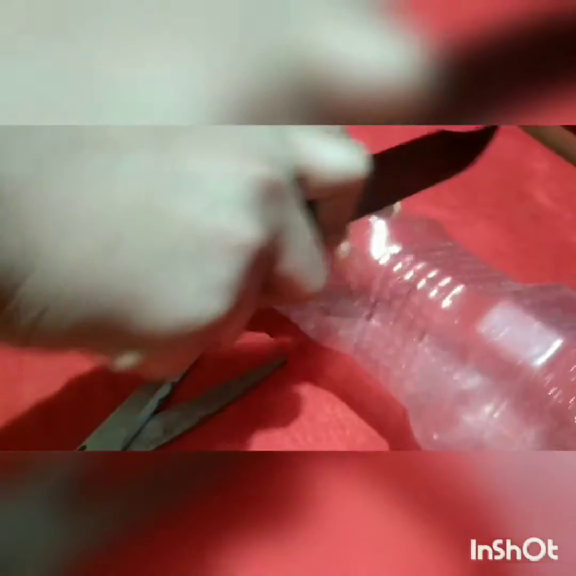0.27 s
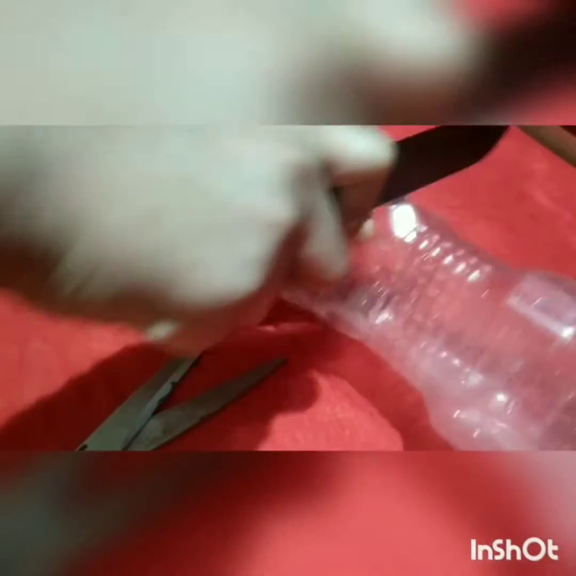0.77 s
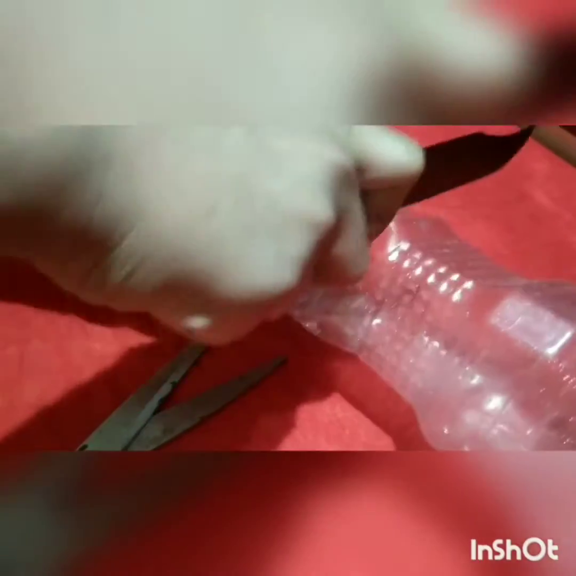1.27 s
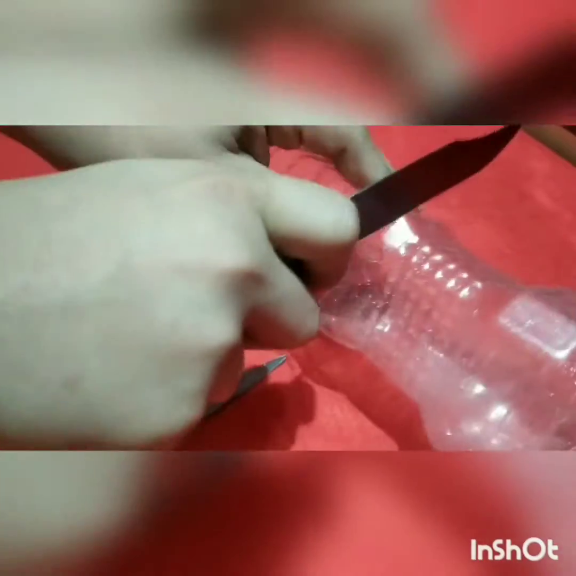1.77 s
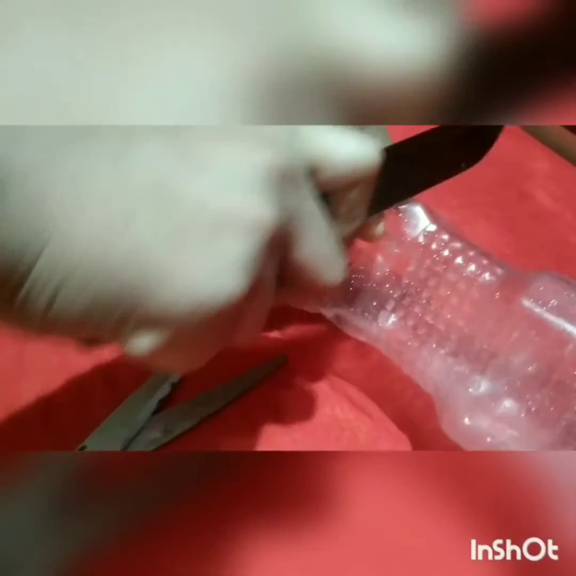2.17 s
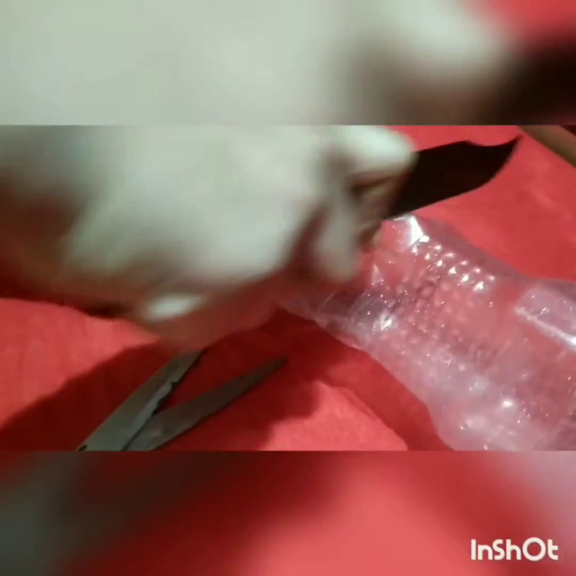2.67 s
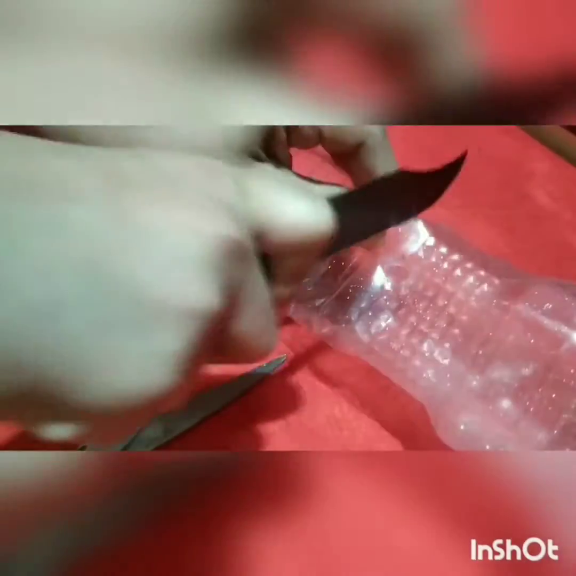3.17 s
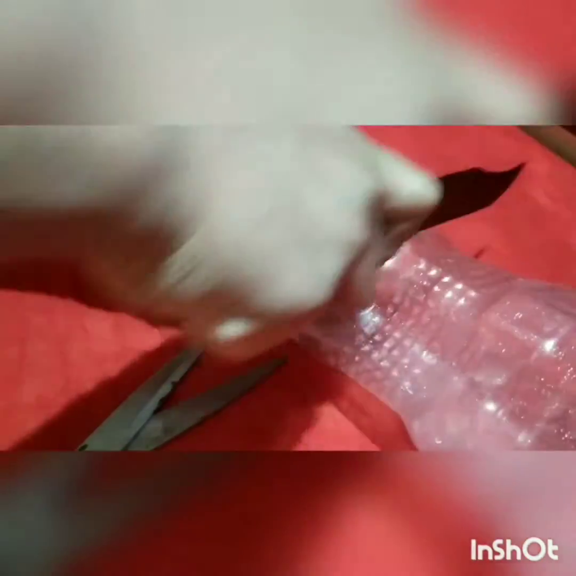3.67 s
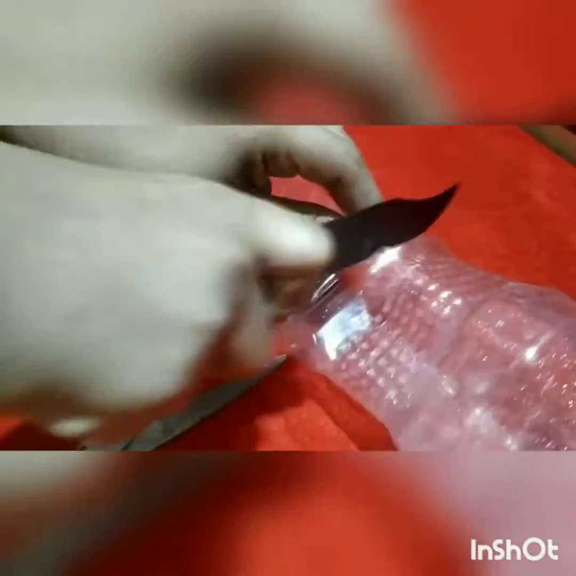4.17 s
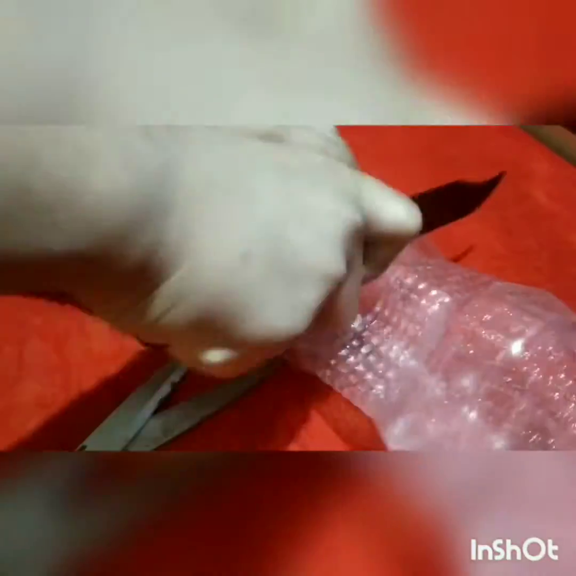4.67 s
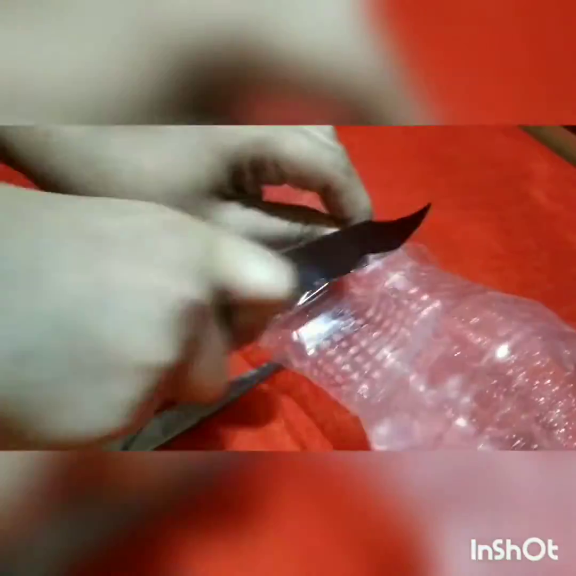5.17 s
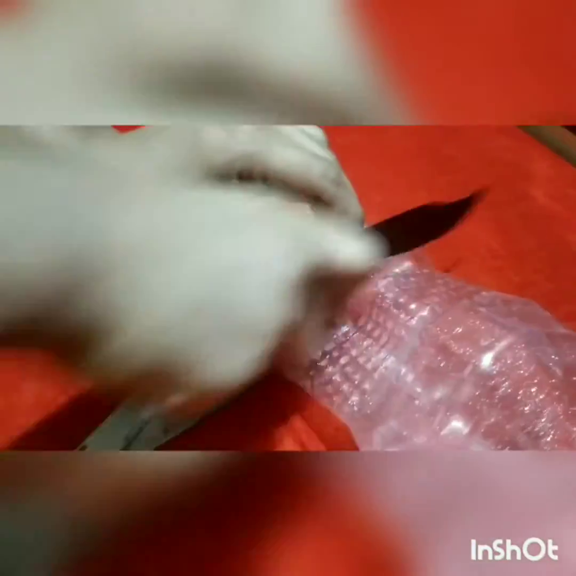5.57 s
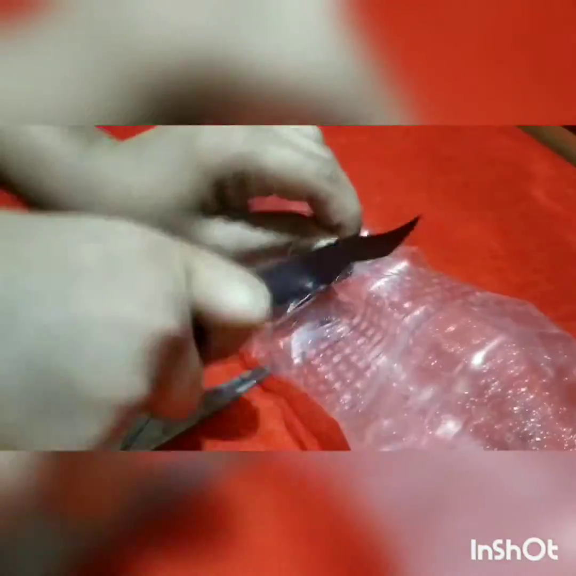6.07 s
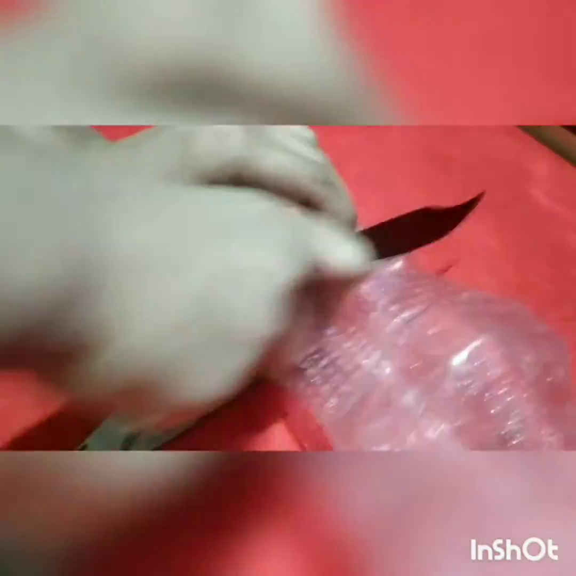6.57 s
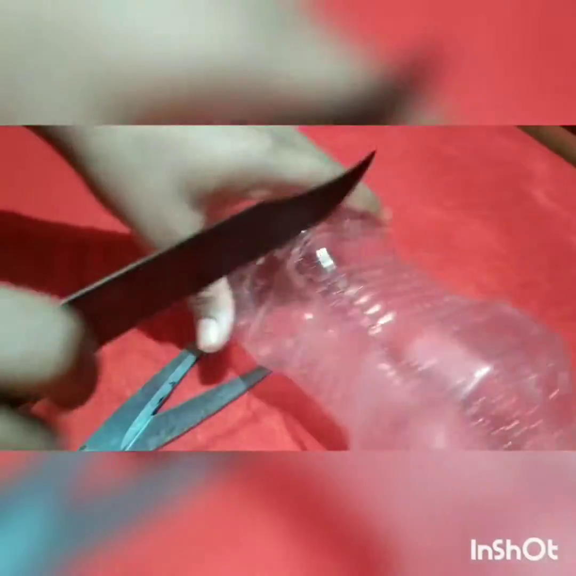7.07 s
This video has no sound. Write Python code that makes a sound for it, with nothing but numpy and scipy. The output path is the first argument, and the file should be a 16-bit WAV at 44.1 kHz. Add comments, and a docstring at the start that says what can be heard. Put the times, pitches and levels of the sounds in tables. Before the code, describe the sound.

A knife saws quickly through a thin, hollow plastic bottle, hissing and rasping, with sharp snaps and short rips, then a few last crackles.

```python
"""Fast sawing strokes hiss and shake a thin, hollow wall; rips and loud snaps cut in; a last few snaps end it.
A knife saws to and fro through an empty plastic bottle on a cloth-covered table in a small room.
Stick-slip noise makes hiss, rasp and the drive of the bottle; volleys of tiny fractures make the rips.
Damped panel modes make snaps and bumps; shaped noise makes the faint table rumble and room air.
Noise echoes dying band by band make the room."""
import sys
import numpy as np
from scipy import signal
from scipy.fft import rfft, irfft, next_fast_len
from scipy.io import wavfile
from scipy.ndimage import uniform_filter1d

SR = 44100
rng = np.random.default_rng(int(sys.argv[2]) if len(sys.argv) > 2 else 0)


def master(y):
    """Save y as 16-bit WAV."""
    cut = np.clip(np.atleast_2d(y).T, -1, 1)
    pcm = np.round(cut * 32767)  # scale
    wavfile.write(sys.argv[1], SR, pcm.astype(np.int16))


N = 322371

# blade strokes: (start [s], length [s], force [relative dB], wall over edge [dB], wall pitch [Hz])
STROKES = [(0.1, 0.14, -1.5, 3.5, 488), (0.288, 0.16, 1.2, 3.5, 466), (0.475, 0.15, 0.5, 5.5, 510),
           (0.743, 0.19, 1.5, 4, 499), (0.958, 0.17, 1, 4.5, 622), (1.177, 0.18, 1.5, 6, 430),
           (2.329, 0.14, 0.5, -3.5, 585), (2.493, 0.17, -0.5, 5.5, 492), (2.702, 0.15, -2.5, 7, 500),
           (2.909, 0.14, -1.5, 8.5, 570), (3.077, 0.16, 3.5, 0.5, 465), (3.253, 0.16, 0, 4.5, 590),
           (3.439, 0.13, -2.5, 0.5, 482), (3.593, 0.15, -0.5, 5.5, 556), (3.806, 0.097, -0.5, 4, 600),
           (3.939, 0.14, 1.5, 4.5, 469), (4.108, 0.15, -1.5, 4.5, 560), (4.276, 0.16, 1.5, 4.5, 588),
           (4.434, 0.14, 1, 3, 505.4), (4.592, 0.18, 1.5, 5.5, 584), (4.747, 0.16, -1.5, 5.5, 619),
           (4.918, 0.15, -1, 8.5, 613), (5.087, 0.13, 2.5, 5.5, 715), (5.242, 0.15, 0.5, 6.5, 700),
           (5.408, 0.14, 0, 5.5, 730), (5.554, 0.15, 0.5, 5, 591), (5.712, 0.14, -1, 6, 688),
           (5.86, 0.15, 2, 5, 777), (6.015, 0.14, 1, 3.5, 700), (6.182, 0.13, 8.5, -4, 678),
           (6.313, 0.15, -4, 6, 690), (6.482, 0.13, 0.5, 7, 656), (6.626, 0.24, -1, 2.5, 610),
           (6.738, 0.23, -1, 1, 670)]
# likeness of left and right: (frequency [Hz], correlation [-1..1])
LIKENESS = [(80, 0.96), (200, 1), (450, 0.65), (850, 0.39), (1200, -0.026), (1800, 0.27), (2400, 0.29),
            (3500, 0.057), (5000, -0.021), (15000, -0.021)]


def from_db(db):
    """Decibels to gain."""
    return 10 ** (np.asarray(db) / 20)


def rms_one(x):
    """Scale to unit power."""
    return x / np.sqrt(np.mean(x ** 2) + 1e-20)


def at_hz(points, hz):
    """Read a table on a log-frequency axis."""
    f, value = np.transpose(points)
    return np.interp(np.log(hz + 1e-3), np.log(f), value)


def colour(x, spectrum):
    """Filter by a smooth spectrum [Hz, dB]."""
    size = next_fast_len(x.shape[-1])
    gain = from_db(at_hz(spectrum, np.fft.rfftfreq(size, 1 / SR)))
    return irfft(rfft(x, size) * gain, size)[..., :x.shape[-1]]


def bands(x, centres):
    """Split a sound into overlapping bands that add up to it."""
    spectrum = rfft(x)
    hz = np.fft.rfftfreq(x.shape[-1], 1 / SR)
    return [irfft(spectrum * at_hz(np.c_[centres, share], hz), x.shape[-1])
            for share in np.eye(len(centres))]


def two_ports(pair):
    """Two unrelated signals become left and right: alike in the bass, apart in the treble."""
    size = next_fast_len(pair.shape[-1])
    mid, side = rfft(pair, size)
    alike = np.clip(at_hz(LIKENESS, np.fft.rfftfreq(size, 1 / SR)), -.99, .99)
    left_right = np.sqrt(1 + alike) * mid + np.sqrt(1 - alike) * side * [[1], [-1]]
    return irfft(left_right, size)[:, :pair.shape[-1]]


def noise(size):
    """White noise, left and right."""
    return two_ports(rng.standard_normal((2, size)))


def wobble(size, per_s):
    """Slow random curve, spread about 1."""
    return signal.resample(rng.standard_normal(max(int(size / SR * per_s), 3)), size)


def add(out, s, sound):
    """Mix a sound in at time s."""
    at = max(round(s * SR), 0)
    out[:, at:at + sound.shape[1]] += sound[:, :N - at]


def resonate(x, hz, width_hz):
    """One two-pole resonance, peak gain about 1."""
    r = np.exp(-np.pi * width_hz / SR)
    zeros = np.array([1, 0, -1]) * (1 - r * r) / 2
    poles = [1, -2 * r * np.cos(2 * np.pi * hz / SR), r * r]
    return signal.lfilter(zeros, poles, x)


def struck(hz, level_db, decay_s, t, rise_s=0.00069, tension=0.081, relax_s=0.0055, stagger_turns=.17):
    """Damped modes with staggered phases sink a little in pitch as the plastic relaxes; unit power."""
    order = np.arange(len(hz))[:, None]
    # phase between left and right
    gap = np.arccos(np.clip(at_hz(LIKENESS, hz), -1, 1)) * rng.choice([-1, 1], len(hz))
    bent_t = t + tension * relax_s * (1 - np.exp(-t / relax_s))
    phase = 2 * np.pi * hz[:, None] * bent_t - 2 * np.pi * stagger_turns * order
    envelope = from_db(level_db)[:, None] * np.exp(-t / decay_s[:, None]) * (1 - np.exp(-t / rise_s))
    return rms_one(np.array([(envelope * np.sin(phase + side * gap[:, None] / 2)).sum(0)
                             for side in (1, -1)]))


def click(t, decay_s, count=3):
    """A short burst that holds all frequencies about equally; unit power."""
    burst = rng.standard_normal((2, len(t))) * np.exp(-t / decay_s)
    for _ in range(count):
        flat = irfft(np.exp(1j * np.angle(rfft(burst))), len(t))
        burst = flat * np.exp(-t / (10 * decay_s))
    return rms_one(burst)


def slips(size, per_s, spread_db, slip_s):
    """Stick-slip: random catches release as tiny dying bursts over steady friction; unit power."""
    catches = rng.random(size) < per_s / SR
    force = catches * from_db(spread_db * np.clip(rng.standard_normal(size), -2, 2))
    power = signal.lfilter([1], [1, -np.exp(-1 / (slip_s * SR))], force ** 2)
    return rms_one(noise(size) * np.sqrt(rms_one(power) + .2))


def chatter(hz, width_hz):
    """The plastic catches and slips at a wandering pitch; unit power."""
    stray = np.sqrt(2 * np.pi * width_hz / SR) * rng.standard_normal(len(hz))
    phase = np.cumsum(2 * np.pi * hz / SR + uniform_filter1d(stray, size=60))
    return rms_one(two_ports(np.array([np.sin(phase), np.cos(phase)])))


def blade_speed(t, length):
    """The blade speeds up and stops again within a stroke: 0 to 1."""
    return np.abs(np.sin(np.pi * np.clip(t / length, 0, 1)))


def room_air():
    """Faint shaped noise of the room, slowly changing in level."""
    # (frequency [Hz], density [relative dB])
    air_spectrum = [(30, 4), (150, 6), (500, 6), (1500, -1.5), (4000, -8.5), (10000, -9.5), (16000, -26.5)]
    # (time [s], level [dB])
    air_level = [(0, -59.5), (6.8, -43), (7.12, -55), (7.31, -63)]
    level_db = np.interp(np.arange(N) / SR, *np.transpose(air_level))
    return from_db(level_db) * rms_one(colour(noise(N), air_spectrum))


def hands(level_db=1.5, swell_db=2.0):
    """The table rumbles under the hands, and more while the blade moves."""
    # (frequency [Hz], density [relative dB])
    rumble_spectrum = [(15, -53), (28, -24.5), (42, -15.5), (60, -1.5), (73, 1), (88, 4.5), (115, -3),
                       (170, -13.5), (260, -24), (500, -35), (1500, -47.5)]
    # hand pressure: (time [s], rumble [relative dB])
    pressure = [(0.0, -43.5), (0.45, -52), (0.81, -57.5), (2.58, -50.5), (2.95, -43), (3.46, -55),
                (3.89, -48.5), (4.5, -51), (5.07, -50), (5.44, -43), (6.15, -50), (6.7, -47.5),
                (7.31, -58.5)]
    t = np.arange(N) / SR
    moving = np.max([blade_speed(t - s, length) for s, length, *_ in STROKES], axis=0)
    rumble_db = level_db + np.interp(t, *np.transpose(pressure)) + swell_db * moving
    return from_db(rumble_db) * rms_one(colour(noise(N), rumble_spectrum))


def room(x, first_echo_s=0.0016, size=24000, count=6):
    """Dense near-wall echoes die band by band; their pattern changes as the hands and the bottle move."""
    # (band centre [Hz], t60 [s], echo [relative dB])
    reverb_bands = [(100.8, 0.84, -1.5), (248, 0.3, 0.5), (490, 0.28, -3), (1000, 0.28, -1),
                    (1990, 0.31, -2), (4000, 0.3, -1), (8000, 0.25, -1), (15000, 0.3, -5)]
    t = np.arange(size) / SR
    out = 0
    centres = [hz for hz, _, _ in reverb_bands]
    decays = []
    for _, t60, echo_db in reverb_bands:
        onset = np.clip(t / first_echo_s - .5, 0, 1)
        decays.append(from_db(echo_db) * rms_one(from_db(-60 * t / t60) * onset))
    # crossfade through successive echo patterns
    for share in np.eye(count):
        split = bands(noise(size), centres)
        echoes = sum(band * decay for band, decay in zip(split, decays)) / np.sqrt(size)
        here = np.sqrt(np.interp(np.linspace(0, count - 1, N), np.arange(count), share))
        out = out + signal.oaconvolve((here * x.mean(0))[None], echoes, axes=1)[:, :N]
    return out


def bottle(x):
    """The bottle's free modes ring in parallel with alternating sign."""
    # (frequency [Hz], width [Hz], gain [relative dB])
    free_modes = [(172, 9.8, -9), (335, 11, 3), (405.2, 10, 3.5), (454, 23.3, 5.5), (504, 83, -9),
                  (687, 30, -10), (804, 110, -11), (876, 5.4, 7.5), (1001, 32, -4), (1114, 58, -3),
                  (1238, 38, -5), (1800, 180, -23), (2220, 49, -8)]
    return sum((-1) ** k * from_db(db) * resonate(x, hz, width)
               for k, (hz, width, db) in enumerate(free_modes))


def groans(rows, roughness, sag, size=16384):
    """Stick-slip on the plastic: a short swell that falls in pitch as it comes to rest."""
    out = np.zeros((2, N))
    for s, length, level_db, hz in rows:
        done = np.clip(np.arange(size) / SR / length, 0, 1)
        pitch_hz = hz * (1 + sag * (.5 - done))
        add(out, s, from_db(level_db) * np.sin(np.pi * done) * chatter(pitch_hz, roughness * hz))
    return out


def dragging():
    """Fingers drag on the bottle and set it groaning by stick-slip."""
    # (start [s], length [s], level [relative dB], mean pitch [Hz])
    drags = [(0, 0.27, -47, 93), (.03, 0.27, -51.5, 129), (.703, 0.042, -42, 351), (2.078, 0.019, -52, 460),
             (3.03, 0.034, -55, 91), (5.36, 0.13, -37.5, 94), (7.19, 0.12, -53, 94)]
    return groans(drags, roughness=0.02, sag=0.26)


def catching():
    """The edge catches within a stroke and the wall grunts by rough stick-slip."""
    # (start [s], length [s], level [relative dB], mean pitch [Hz])
    catches = [(.335, 0.054, -36, 517), (1.215, 0.084, -38, 498.6), (3.17, 0.046, -39, 596),
               (3.915, 0.024, -31.5, 548), (4.02, 0.061, -39, 1163), (4.08, 0.02, -35, 496),
               (5.15, 0.045, -28.5, 838), (5.475, 0.028, -27, 790), (5.588, 0.034, -29, 735),
               (5.655, 0.024, -28.5, 655), (5.9, 0.025, -29.5, 830), (5.968, 0.027, -29, 551),
               (6.06, 0.014, -30, 993), (6.118, 0.02, -28.5, 643), (6.755, 0.029, -30, 895)]
    return groans(catches, roughness=0.22, sag=0.12)


def panel_ring(hz, t, ring_s=0.0028):
    """A panel rings briefly around its own pitch; its high modes die first."""
    # (multiple of panel pitch [1], level [relative dB])
    panel_modes = [(.5, -8.5), (0.679, -1.5), (.86, 3), (1.031, 2.5), (1.24, -1), (1.501, 0), (1.8, -2.5),
                   (2.15, -7), (2.6, -11), (3.3, -17)]
    multiple, level_db = np.transpose(panel_modes)
    mode_hz = hz * multiple
    return struck(mode_hz, level_db, ring_s * (1000 / mode_hz) ** 0.17, t)


def thud(t, thud_s=0.0031):
    """The low modes of the whole bottle, struck by the table."""
    # (frequency [Hz], level [relative dB])
    low_modes = [(150, -6.5), (205, 2), (305, -3.5)]
    hz, level_db = np.transpose(low_modes)
    return struck(hz, level_db, np.full(len(hz), thud_s), t)


def bumping(thud_db=-24.0, ring_db=-9.0, cloth_cut=1.96, size=2048):
    """The bottle gives way and lands: a thud and one panel's ring, its higher modes muffled by the cloth."""
    # (time [s], level [relative dB], pitch of the landing panel [Hz])
    bumps = [(0.684, -32.5, 420), (1.479, -19.5, 327), (1.503, -27, 223), (1.792, -36, 394),
             (1.878, -22, 297), (2.121, -30, 486), (2.883, -11.5, 416), (2.951, -19.5, 347),
             (3.083, -24, 343), (3.253, -26, 238), (3.727, -18, 380), (3.77, -13, 403), (4.734, -18.5, 450),
             (4.993, -31, 402), (5.853, -32.5, 500), (6.81, -29, 300), (6.897, -14.5, 445)]
    out = np.zeros((2, N))
    t = np.arange(size) / SR
    for s, level_db, hz in bumps:
        cloth = signal.butter(2, cloth_cut * hz, fs=SR, output="sos")
        ring = signal.sosfilt(cloth, panel_ring(hz, t))
        add(out, s, from_db(level_db) * (from_db(thud_db) * thud(t) + from_db(ring_db) * ring))
    return out


def snapping(ring_db=-7.0, crack_db=-10.0, crack_s=0.0058, after_ring_db=-4.0, after_ring_s=0.0099, size=4096):
    """A panel flips over: a crack, a short ring at the panel's own pitch, and one mode that rings on. The last
    two rows, after the cutting has stopped, are light scrape ticks made in the same way."""
    # (time [s], level [relative dB], pitch [Hz], crack over ring [relative dB],
    #  after-ring [Hz], after-ring [relative dB])
    snaps = [(1.398, -53.5, 900, 10.5, 814, 0), (1.425, -31.5, 606, -23, 650, -13),
             (1.445, -21.5, 1420, -6, 1670, -12), (1.464, -23, 634, -18, 586, -12.5),
             (1.4762, -12.5, 710, 3, 613, -12), (1.5018, -11, 734, 0.5, 679, -7),
             (1.528, -22.5, 840, -17, 860, -5), (1.723, -36.5, 510, -13.5, 480, -16.5),
             (1.7918, -25.5, 1060, -22, 997, -13), (1.877, -20, 1125, 14, 564, -13),
             (2.12, -25.5, 720, 9, 530, -3), (2.8806, -6, 1009, -11, 1590, -17),
             (2.89, -19, 850, -30, 990, -10), (2.905, -38, 1490, -11, 910, -4.5),
             (2.929, -35, 1600, -19, 2010, -8), (3.725, -16.5, 650, 7.5, 505, -14.5),
             (3.77, -9.5, 527, -2, 477, -10.5), (3.779, -22, 820, 4.5, 1117, -2),
             (3.849, -21, 910, -19, 768, -15), (3.874, -36, 636, -18, 540, -5),
             (3.934, -30, 1385, -30, 1156, -7.5), (4.154, -26, 910, -19, 1630, -23),
             (4.7314, -5, 1055, -7, 1083, -6.5), (4.746, -20.5, 750, -7, 1120, -5),
             (4.759, -22.5, 1140, -8, 1050, 0.5), (4.8255, -24, 915, 0, 890, -22),
             (5.145, -30.5, 930, 3, 840, 0), (5.276, -49, 810, -13, 890, -10),
             (5.32, -26, 856, 4, 2125, -13), (5.537, -37.5, 1000, -14, 1070, -15),
             (6.235, -15, 1380, 4, 973, -16), (6.248, -19, 1200, -14, 977, -6.5),
             (6.474, -33.5, 990, -16, 930, 0), (6.818, -19.5, 885, 2.5, 1080, -18),
             (6.864, -32, 655, 4, 604, -18), (6.879, -16.5, 1480, 4, 2300, -14),
             (6.885, -19.5, 830, -13, 955, -3), (6.904, -22.5, 620, -3, 410, -6.5),
             (6.939, -18, 897, 3, 555, -11.5), (6.948, -16.5, 1263, -4.5, 1700, -20),
             (7.063, -43, 490, -0.5, 304, -12), (7.169, -60.5, 1196, 2, 1800, -12)]
    # (frequency [Hz], density [relative dB])
    crack_spectrum = [(30, -21.5), (150, -28), (400, 22.5), (1200, 17.5), (2300, 19.5), (3500, 14),
                      (6000, 9.5), (9000, 2), (12000, -30.5), (16000, -23.5)]
    out = np.zeros((2, N))
    t = np.arange(size) / SR
    early = t[:size // 2]
    for s, level_db, hz, sharp_db, after_hz, after_db in snaps:
        burst = colour(two_ports(click(early, crack_s)), crack_spectrum)
        crack = from_db(sharp_db + crack_db) * rms_one(burst * np.exp(-early / (10 * crack_s)))
        # a small panel radiates little below its lowest mode or above its highest
        limits_hz = [0.28 * hz, min(8.0 * hz, .4 * SR)]
        radiation = signal.butter(2, limits_hz, "band", fs=SR, output="sos")
        ring = signal.sosfilt(radiation, panel_ring(hz, early))
        add(out, s, from_db(level_db) * (from_db(ring_db) * ring + crack))
        after_ring = struck(np.array([after_hz]), np.zeros(1), np.array([after_ring_s]), t)
        add(out, s, from_db(level_db + after_db + after_ring_db) * after_ring)
    return out


def ripping(level_db=8.0, fade_s=0.0017, swell_db=12.5, fall_db_per_s=243, usual_db=-20.5,
            brighten=0.38, size=4096):
    """The cut runs ahead in a dense volley of tiny fractures, which swells, loses force and stops."""
    # the edge bites: (start [s], length before fade [s], time to peak [s], peak force [relative dB])
    rips = [(1.455, 0.071, 0.044, -29), (1.873, 0.047, 0.0045, -24.5), (2.117, 0.055, 0.0019, -17),
            (3.721, 0.064, 0.0014, -23), (5.144, 0.0029, 0.0015, -22), (6.213, 0.06, 0.02, -22.5)]
    # (frequency [Hz], density [relative dB])
    rip_spectrum = [(30, -37), (90, -7.5), (170, 4), (300, -1), (500, 1), (950, 12), (1400, 0.5), (2100, 6),
                    (3000, 0.5), (4500, 4.5), (7000, 3.5), (10000, 0.5), (13000, -5.5), (16000, -16)]
    out = np.zeros((2, N))
    t = np.arange(size) / SR
    for s, length, attack_s, peak_db in rips:
        rise_db = swell_db * np.maximum(1 - t / attack_s, 0)
        fall_db = fall_db_per_s * np.maximum(t - attack_s, 0)
        fade = np.exp(-np.maximum(t - length, 0) / fade_s)
        force = from_db(peak_db - rise_db - fall_db) * fade
        fractures = slips(size, per_s=1200, spread_db=3.0, slip_s=.0008)
        # a harder rip is brighter: treble dB per dB of force
        treble = [(1000, 0.011), (8000, brighten * (peak_db - usual_db))]
        add(out, s, from_db(level_db) * force * rms_one(colour(colour(fractures, rip_spectrum), treble)))
    return out


def shifting(x, depth_db=2.0, count=9):
    """The point of contact travels along the slit, so each band swells and fades by itself."""
    centres = np.geomspace(1200, 14000, count)
    return sum(band * from_db(depth_db * wobble(x.shape[-1], per_s=35)) for band in bands(x, centres))


def burrs(speed, per_s=65, spread_db=5.5, low_hz=900, high_hz=3400, width_hz=260, count=7):
    """The edge flicks burrs, more the faster it moves, each ticking at one of several pitches; unit power."""
    size = len(speed)
    out = 0
    for hz in np.geomspace(low_hz, high_hz, count):
        hits = rng.random(size) < speed * per_s / count / SR
        flicks = hits * from_db(spread_db * np.clip(rng.standard_normal(size), -1.5, 1.5))
        sides = rng.standard_normal((2, size)).clip(-1, 1)
        out = out + resonate(flicks * sides + 1e-18, hz, width_hz)
    return rms_one(out)


def thin_wall(x, decay_s=0.01, ring_db=-3.0, size=1024):
    """Thin plastic adds a short ring of many close treble modes, new ones at each place the blade touches."""
    # (frequency [Hz], density [relative dB])
    ring_spectrum = [(500, -6), (2000, -4.5), (4000, -4.5), (15000, -0.5)]
    t = np.arange(size) / SR
    modes = colour(rng.standard_normal((2, size)), ring_spectrum)
    ring = rms_one(modes * np.exp(-t / decay_s)) / np.sqrt(size)
    ringing = signal.fftconvolve(x, ring, axes=1)[:, :x.shape[1]]
    return (x + from_db(ring_db) * ringing) / np.hypot(1, from_db(ring_db))


def sawing(hiss_db=-2.0, rasp_db=-16.0, wall_db=-8.5, chatter_db=-16.5, modes_db=-6.5, burr_db=-10.0,
           release_db=0.5, hiss_power=0.94, grip_power=0.49, uneven_db=1.35, size=16384):
    """Each stroke speeds up and stops: the blade grips the wall at once and hisses more the faster it goes."""
    # spectra of the hiss and of the cut edges' rasp: (frequency [Hz], density [relative dB])
    hiss_spectrum = [(400, -24.5), (1500, -12), (2800, -2), (4000, -3), (6000, -4.5), (8000, -4.5),
                     (10000, -4.5), (12500, -8.5), (15500, -20)]
    rasp_spectrum = [(40, -26), (150, 8), (400, 9.5), (900, 3.5), (1350, -9), (1700, 8), (2200, 0),
                     (2700, -22), (4500, -1.5), (15000, -15.5)]
    # response of the wall to flexing: (frequency [Hz], gain [dB])
    flex_response = [(100, -3), (300, 5.5), (1050, -2), (1350, -1), (3000, 4)]
    # strokes grow louder as the slit deepens
    start_db, rise_db_per_s = -44, 2
    hiss, wall, drive = np.zeros((3, 2, N))
    t = np.arange(size) / SR
    for s, length, force_db, answer_db, hz in STROKES:
        edge_db = start_db + rise_db_per_s * s + force_db
        push_db = edge_db + answer_db
        speed = blade_speed(t, length)
        # the hand presses unevenly and eases off before it turns
        pressure_db = uneven_db * wobble(size, per_s=64)
        ease_db = release_db * (.5 - np.clip(t / length, 0, 1))
        grip = speed ** grip_power * from_db(pressure_db + ease_db)
        slide = speed ** hiss_power * from_db(pressure_db / 2)
        friction = slips(size, per_s=550, spread_db=4.3, slip_s=.0007)
        judder = slips(size, per_s=120, spread_db=0.5, slip_s=0.0024)
        blade = from_db(edge_db + hiss_db) * slide * rms_one(colour(friction, hiss_spectrum))
        # the rasp grows less than the hiss as the slit deepens
        rasp = from_db(rasp_db + 0.62 * edge_db) * grip * rms_one(colour(judder, rasp_spectrum))
        ticks = from_db(edge_db + burr_db) * grip * burrs(speed)
        add(hiss, s, thin_wall(shifting(blade + rasp) + ticks, ring_db=5.5))
        # the wall flexes around its pitch; its squeak rises with blade speed
        flex = rms_one(resonate(resonate(noise(size), hz, 650), hz, 820))
        squeak_level = from_db(1.1 * wobble(size, per_s=79))
        squeak = chatter(hz * (.9 + 0.27 * speed), width_hz=118) * squeak_level
        shake = from_db(wall_db) * flex + from_db(chatter_db) * squeak
        add(wall, s, from_db(push_db) * grip * shake)
        add(drive, s, from_db(push_db + modes_db) * grip * judder)
    return hiss + colour(wall, flex_response) + from_db(17) * bottle(drive)


def scene():
    """Strokes, rips, snaps and bumps in the room, over hand rumble and room air."""
    saw = sawing() + catching() + dragging()
    rips = ripping()
    snaps = snapping()
    bumps = bumping()
    # snaps also ring the whole bottle
    cutting = saw + rips + snaps + bumps + bottle(from_db(-12) * snaps)
    echo = room(from_db(-7.5) * saw + from_db(-5.0) * rips + from_db(-6.0) * snaps + from_db(-5.0) * bumps)
    return cutting + echo + hands() + room_air()


def record(dry):
    """Soft saturation rounds the loudest peaks; a steep low-pass cuts the top."""
    rounded = .92 * np.tanh(dry / .92)
    low_pass = signal.ellip(10, .2, 80, 16100, fs=SR, output="sos")   # ripple dB, stopband dB, edge Hz
    return signal.sosfilt(low_pass, rounded)


dry = scene()
out = record(dry)
master(out)
```